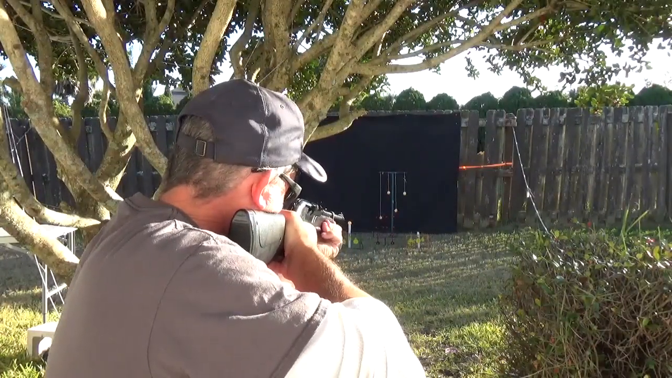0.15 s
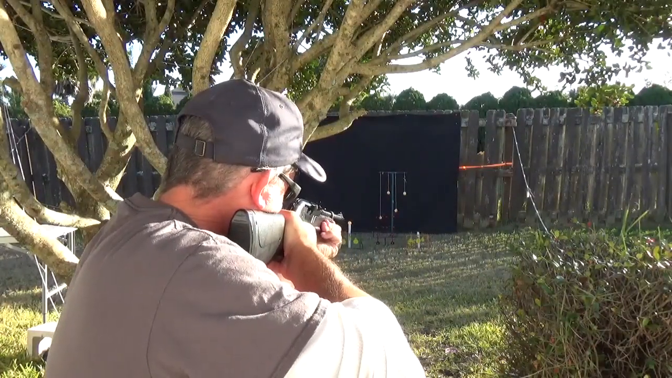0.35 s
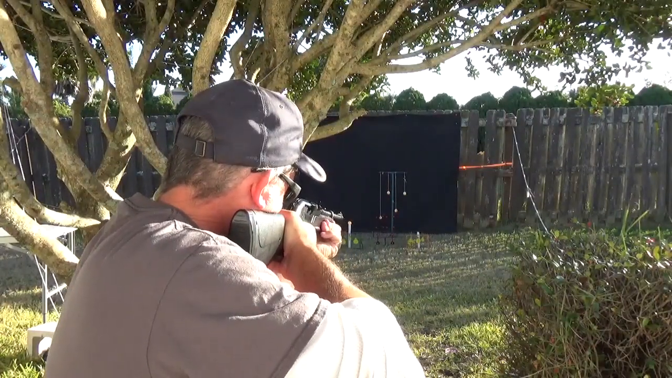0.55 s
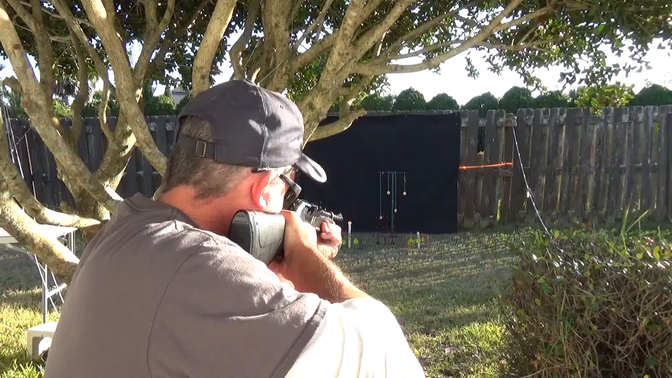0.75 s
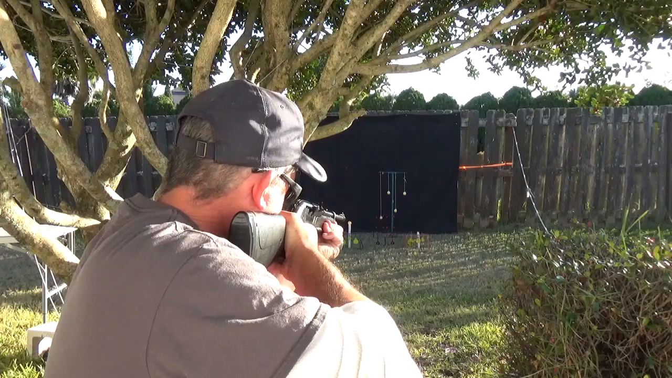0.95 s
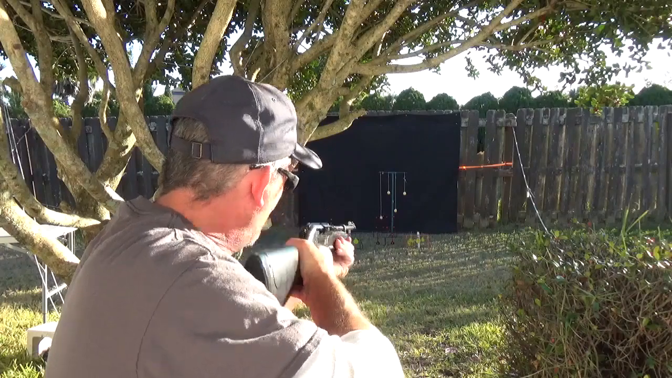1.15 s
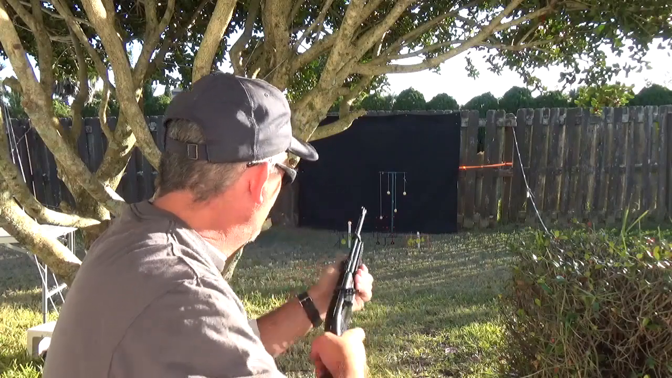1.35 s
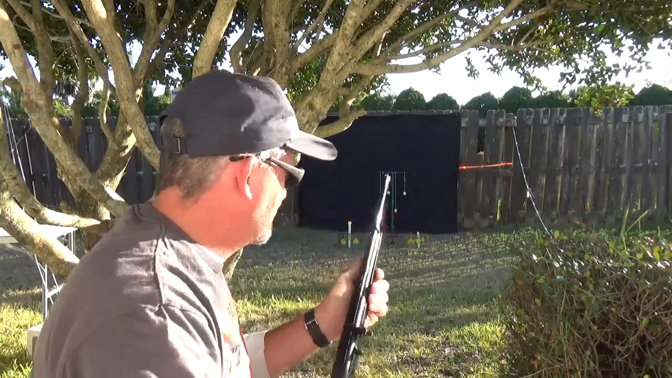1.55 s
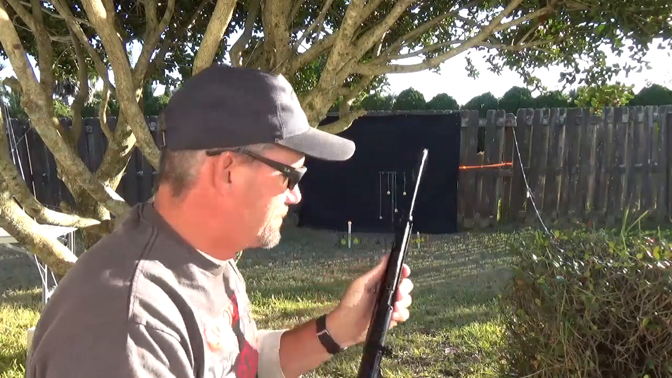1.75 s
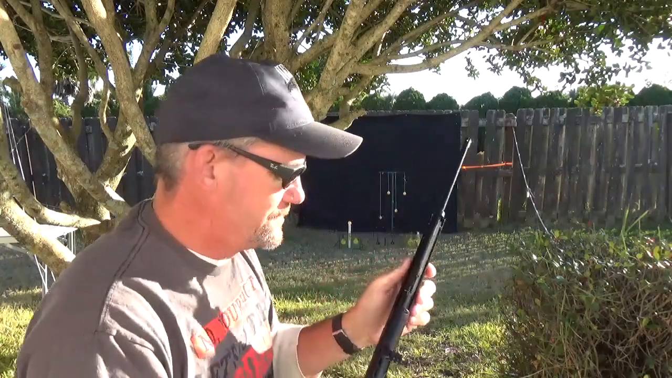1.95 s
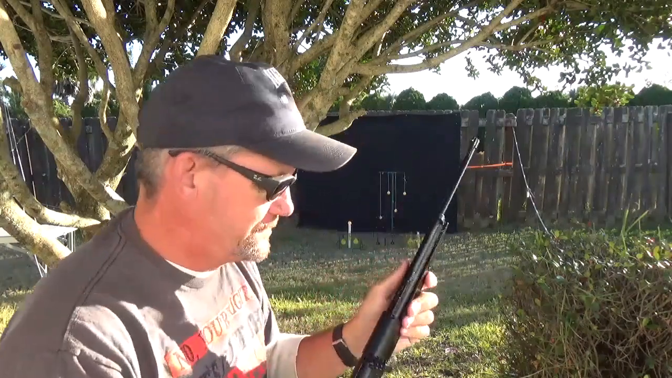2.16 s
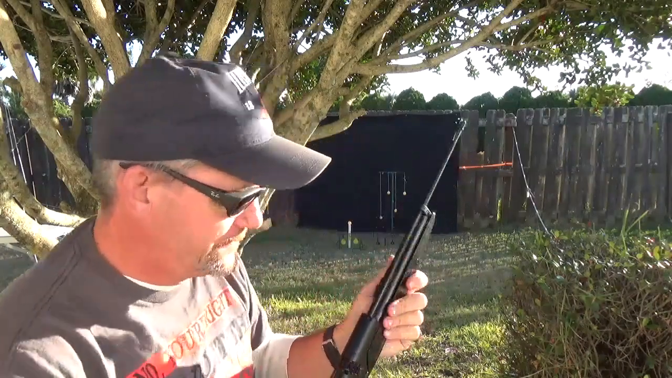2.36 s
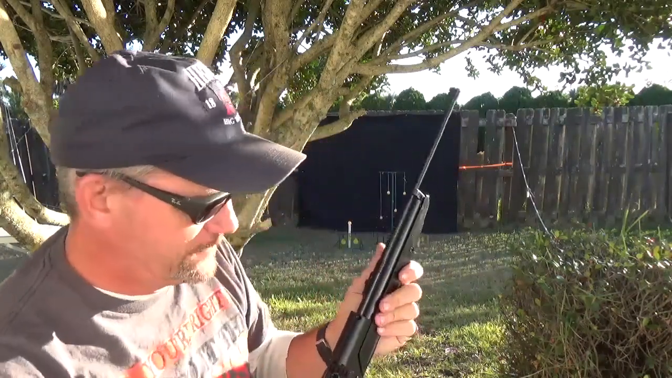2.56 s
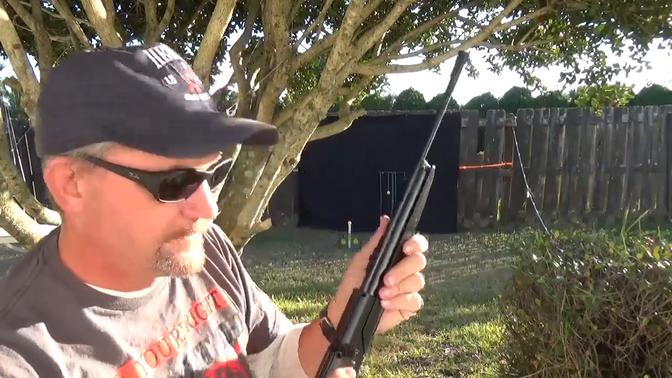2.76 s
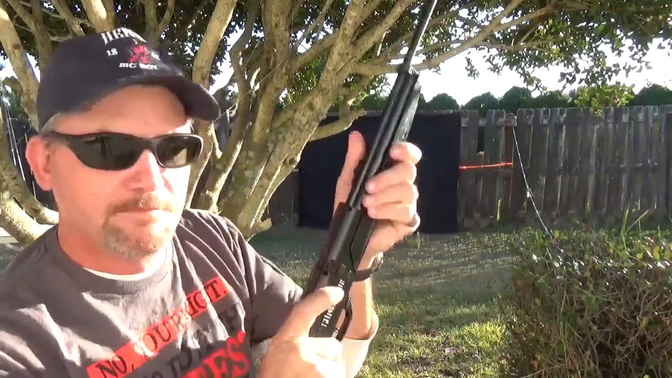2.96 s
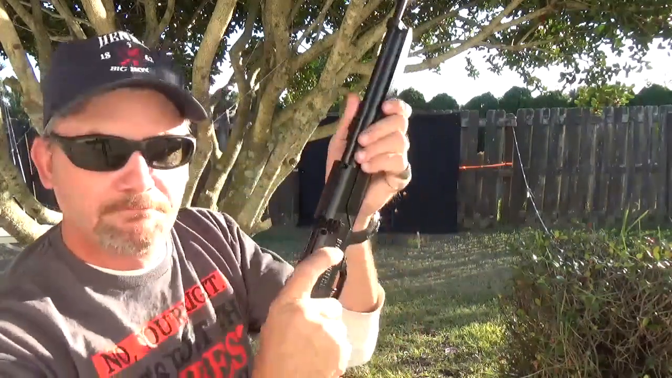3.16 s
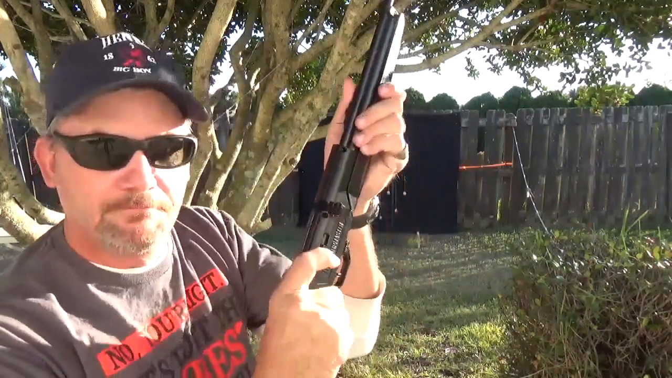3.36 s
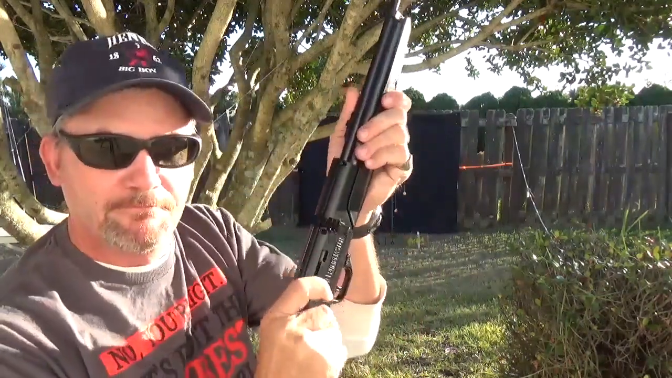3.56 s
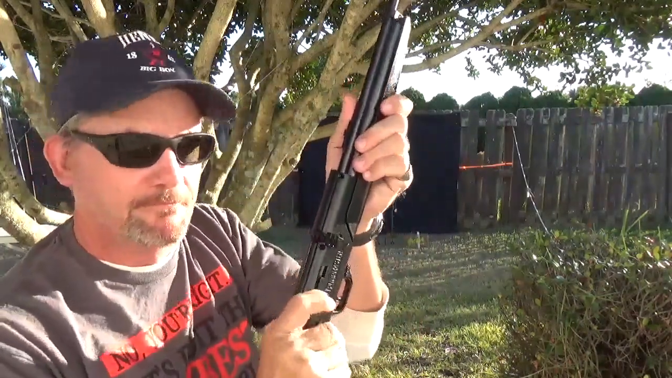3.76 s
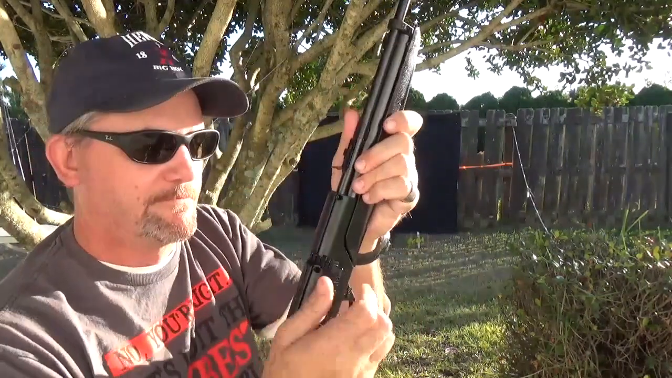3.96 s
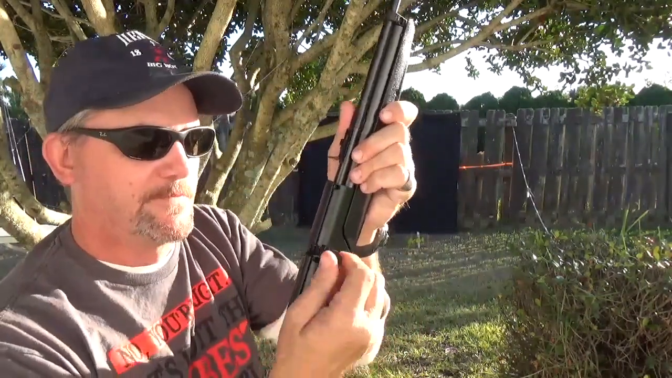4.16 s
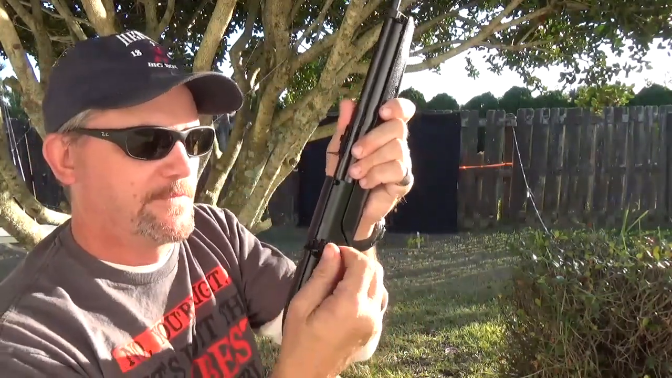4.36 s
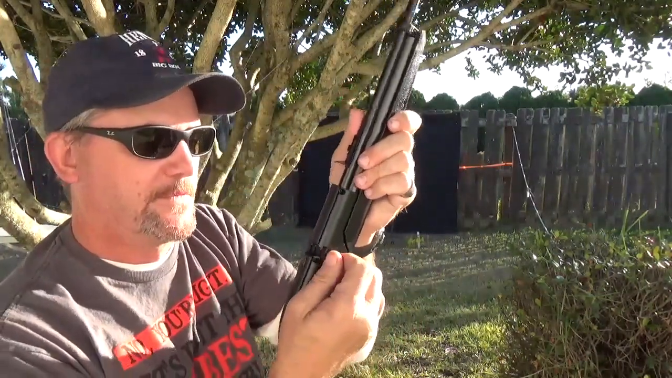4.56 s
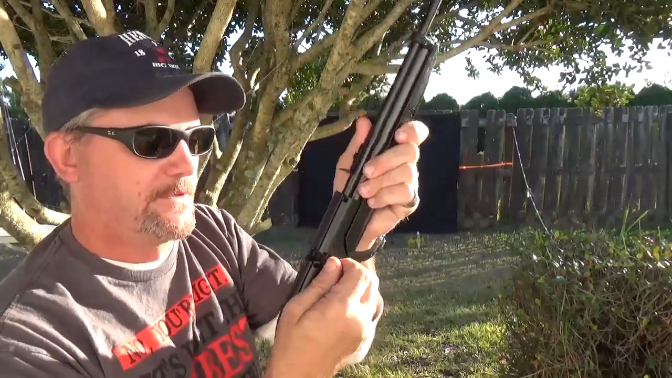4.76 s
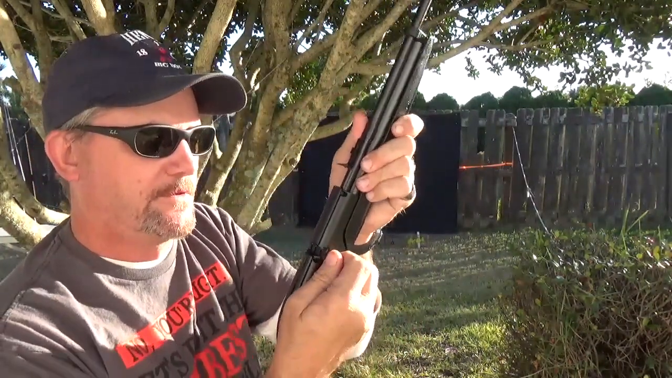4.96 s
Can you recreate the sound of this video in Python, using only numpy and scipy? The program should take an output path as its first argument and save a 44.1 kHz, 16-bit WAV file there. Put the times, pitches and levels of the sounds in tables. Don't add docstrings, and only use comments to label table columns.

```python
import sys
import numpy as np
from scipy import signal
from scipy.fft import rfft, irfft, next_fast_len
from scipy.io import wavfile
from scipy.ndimage import uniform_filter1d

SR = 44100
rng = np.random.default_rng(int(sys.argv[2]) if len(sys.argv) > 2 else 0)


def waveform_to_disk(signal):
    frames = np.transpose(np.atleast_2d(signal))
    scaled = np.clip(frames, -1, 1) * 32767
    samples = np.round(scaled).astype(np.int16)
    wavfile.write(sys.argv[1], SR, samples)


def magnitude_from_level(level_db):
    exponent = np.asarray(level_db, float) / 20
    return 10 ** exponent


N = 221002
TIME = np.arange(N) / SR


def evened(x):
    return x / np.sqrt(np.mean(x ** 2) + 1e-20)


def read(points, hz):
    f, value = np.transpose(points)
    return np.interp(np.log(hz + 1), np.log(f + 1), value)


def add(mix, s, sound):
    part = mix[round(s * SR):][:len(sound)]
    part += sound[:len(part)]


def coloured(x, spectrum):
    size = next_fast_len(len(x))
    gain = magnitude_from_level(read(spectrum, np.fft.rfftfreq(size, 1 / SR)))
    return evened(irfft(rfft(x, size) * gain, size)[:len(x)])


def grit(per_s, spread_db):
    size = magnitude_from_level(spread_db * np.minimum(rng.exponential(1, N), 3))
    contacts = size * (rng.random(N) < per_s / SR)
    return contacts * rng.standard_normal(N) + .5 * rng.standard_normal(N)


def resonate(x, hz, width):
    turn = np.exp(2j * np.pi * np.cumsum(hz * np.ones(len(x))) / SR)
    r = np.exp(-np.pi * width / SR)
    return 2 * (turn * signal.lfilter([1 - r], [1, -r], x / turn)).real


def resonate_twice(x, hz, width):
    return evened(resonate(resonate(x, hz, width), hz, width))


def slow_noise(shape, size):
    return evened(uniform_filter1d(rng.standard_normal(shape), size))


def struck(t, rise, t60):
    shape = (1 - np.exp(-(t / rise) ** 2)) * magnitude_from_level(-60 * t / t60)
    return shape / shape.max()


def tone(hz, t):
    return np.sin(2 * np.pi * hz * t)


def surges(peak_s, db, build_t60, fade_t60):
    t = TIME - np.asarray(peak_s)[:, None]
    build = 60 / (build_t60 * np.ones(len(t)))[:, None]
    slope = np.where(t < 0, build, -60 / fade_t60[:, None])
    level_db = db[:, None] + np.maximum(slope * t, -150)
    return np.sqrt((magnitude_from_level(level_db) ** 2).sum(0))


# (frequency [Hz], density [dB per Hz])
TRAFFIC = [(34, -40.5), (58, -7), (107, 1), (171, -13), (296, -19.5), (330, -24), (369, -16.5), (403, -18),
           (746, -19), (930, -23.5), (2150, -27.5), (3720, -33), (11200, -41.5), (14600, -83.5),
           (22000, -120)]
# (frequency [Hz], bandwidth [Hz], level [dB])
INSECTS = [(1858, 60, -78.5), (2000, 60, -77)]
# (peak time [s], level over their drone [dB], build-up T60 [s], fade T60 [s])
SONG = [(0.401, 3, 3, 2.8), (2.12, 8, 0.71, .5), (2.32, 12, 0.46, .5), (3.019, 5, 1.1, 1.3),
        (4.06, 4, 0.52, 0.53), (4.8, -0.5, 2.5, 3)]
# (frequency [Hz], level [dB])
MACHINE = [(35, -69.5), (291, -66.5)]


def garden():
    swell = evened(uniform_filter1d(slow_noise(N, 5000), 5000))
    out = magnitude_from_level(-54.5 + 0.44 * swell) * coloured(rng.standard_normal(N), TRAFFIC)
    for hz, width, db in INSECTS:
        song = .6 + surges(*np.transpose(SONG))
        out += magnitude_from_level(db) * song * resonate_twice(rng.standard_normal(N), hz, width)
    truck_s, truck_hz, truck_width_s = 4.2, 90, 0.073
    passing = magnitude_from_level(-53) * np.exp(-((TIME - truck_s) / truck_width_s) ** 2)
    rumble = resonate(rng.standard_normal(N), truck_hz, 93)
    out += passing * evened(resonate(rumble, truck_hz, 100))
    for hz, db in MACHINE:
        out += magnitude_from_level(db + 1.2 * swell) * tone(hz, TIME)
    return out


# (time [s], peak level [dB], top pitch [Hz], sweep [Hz], hoarseness [0-1])
CHIPS = [(.004, -45, 5800, 1500, .25), (.504, -61, 5580, 300, .15), (.516, -56, 5620, 300, .15),
         (.578, -46, 5750, 1600, .22), (1.38, -50, 5600, 900, .6), (1.62, -45, 5520, 900, .15),
         (2.185, -47, 5400, 800, .15), (3.179, -56, 5250, 300, .3), (3.19, -48, 5450, 500, .5),
         (4.608, -51, 5450, 900, .8), (4.72, -56, 5300, 900, .4)]


def bird():
    t, out = np.arange(SR // 40) / SR, np.zeros(N)
    for s, db, hz, sweep_hz, hoarse in CHIPS:
        pitch = hz - sweep_hz * (np.exp(-t / .002) + (t / .014) ** 4).clip(0, 1.2)
        pitch += 800 * hoarse * slow_noise(len(t), 50)
        wave = np.sin(2 * np.pi * np.cumsum(pitch) / SR)
        add(out, s, magnitude_from_level(db) * wave * struck(t, .0035, .045))
    return out


# (frequency [Hz], density [dB per Hz])
STEEL = [(1470, -53.5), (2500, -11), (3460, -5.5), (4680, -5.5), (6020, 3), (6530, 1), (7590, -1.5),
         (9300, -4.5), (10800, -5), (11200, -10), (14600, -46), (22000, -120)]


def contact(t, snap_t60, db, knock_db, knock_hz, clearness, knock_t60, rise):
    snap, push = rng.standard_normal((2, len(t)))
    width = knock_hz * max(.95 - 1.5 * clearness, .2)
    blurred = resonate_twice(push, knock_hz, width)
    knock = (1 - clearness) * blurred + clearness * 2.13 * tone(knock_hz, t)
    snap = coloured(snap, STEEL) * struck(t, rise, snap_t60)
    snap = 0.77 * snap / abs(snap).max()
    return magnitude_from_level(db) * (snap + .5 * magnitude_from_level(knock_db) * knock * struck(t, 1.3 * rise, knock_t60))


# (peak time [s], fizz [dB], swish re fizz [dB], build-up T60 [s], fade T60 [s])
RUSTLE = [(1.08, -62, -3.5, 0.6, 1), (1.228, -53.5, -3, 0.25, 1.8), (1.7, -59.5, 0.5, 2.2, 12),
          (1.794, -58.5, 2.5, 0.55, 2.5), (2.029, -44.5, 0.5, 0.088, 0.16), (2.16, -50, -7, 0.18, 0.28),
          (2.347, -51.5, -20, 0.26, 0.65), (2.423, -44.5, 6.5, 0.26, 0.11), (2.555, -64, 6, 0.51, 0.14),
          (2.8, -61, 0, .6, 0.26), (2.9, -53.5, -2, 0.11, 0.37), (3.139, -73.5, -9.5, .2, 0.54),
          (3.63, -67, 19, 0.88, 0.16), (3.849, -64.5, 6, 1.36, 0.62), (4.02, -68.5, 7, 0.26, 0.18),
          (4.141, -54, 7, 0.1, 0.27), (4.25, -65.5, 16.5, 0.57, 1.54), (4.6, -77, 7, 0.61, 0.73),
          (4.8, -70.5, 7, 0.78, 0.52)]
# (peak time [s], level [dB], build-up T60 [s], fade T60 [s])
SHIFTS = [(1.45, -55, 1.1, 6.3), (1.794, -46, 0.64, 2), (2.03, -43, 0.29, 0.15), (2.16, -47, 0.63, 0.53),
          (2.42, -47, 0.88, 1.5), (2.891, -56.5, 1.44, 4.2), (3.68, -50, 1.1, 3.7), (4.2, -56, 1.25, 3.04),
          (4.85, -55.5, 3.2, 3.1)]
# (frequency [Hz], density [dB per Hz])
FIZZ = [(3530, -18.5), (6000, -4), (8190, -9.5), (10600, -8), (11200, -12), (14600, -45), (22000, -120)]
SWISH = [(1060, -30.5), (1800, 1), (2100, -2), (2950, -2.5), (3750, -8), (5770, -1.5), (7000, -13.5),
         (9100, -44), (15400, -120)]
DULL = [(76, -36.5), (130, -10), (183, 6.5), (222, -7), (285, 4.5), (384, -1), (868, -1.5), (4500, -17.5),
        (5850, -57), (9900, -120)]
# (time [s], peak level [dB], knock re peak [dB], knock frequency [Hz])
TAPS = [(1.408, -42.5, -4.5, 2890), (1.554, -47.5, 5.5, 1894), (1.776, -30.5, -17, 845),
        (2.0199, -39, 3, 760), (2.106, -47, 3, 1800), (2.147, -38, -7, 870), (2.2944, -42, -1.5, 840),
        (2.348, -35, -26, 686), (2.374, -33, -11, 2050), (2.459, -39, -15, 754), (2.532, -43.5, 2.5, 1975),
        (2.6967, -35.5, 1.5, 1360), (3.0741, -56.5, -0.5, 1420), (2.651, -47, -16, 2170),
        (2.9634, -46.5, -4.5, 1700), (3.1421, -48, -5.5, 604), (4.009, -36.5, -6.5, 1710)]
# (time [s], peak level [dB], knock re peak [dB], knock frequency [Hz])
BUMPS = [
    (1.7672, -37, 5, 242),
    (1.7761, -36, 0, 460),
    (1.7889, -42, 2.5, 860),
    (1.804, -48, -1, 755),
]
# (time [s], peak level [dB], knock re peak [dB], knock frequency [Hz])
KNOCKS = [(2.0203, -30.5, -1, 814), (2.4042, -38, 1.5, 758), (2.4112, -30, 3.5, 880),
          (2.4185, -35.5, 7, 880), (2.4265, -29.5, 6, 893), (2.4405, -40, 4, 880), (2.416, -41.5, 8, 2950),
          (2.417, -40, 7, 1500), (2.425, -41, 7.5, 2960), (2.425, -38, 7, 2100), (2.43, -43, 6, 3400)]
# (time [s], peak level [dB], knock re peak [dB], knock frequency [Hz])
PINGS = [
    (2.537, -47, 8, 1293),
    (2.899, -39, -10.5, 1294),
]
# (time [s], peak level [dB], knock re peak [dB], knock frequency [Hz])
TICKS = [(1.5285, -43, -26.5, 3470), (1.5523, -43, 3, 2000), (1.658, -32, -23, 2320),
         (2.5288, -35.5, -1.5, 4920), (3.7285, -36, -3, 3080), (4.1255, -53.5, -5, 2156),
         (4.1395, -41.5, -1.5, 1105), (4.151, -36, -8, 2400), (4.165, -49, -10, 2220),
         (4.2295, -39, -1, 4500)]
# (clearness [0-1], knock T60 [s], snap T60 [s], rise [s])
CONTACTS = [
    (0.17, 0.047, 0.02, 0.0017),
    (0.27, 0.088, 0.024, 0.0019),
    (0.45, 0.068, 0.02, 0.0013),
    (0.68, 0.12, 0.026, 0.0019),
    (0.24, 0.015, .011, 0.0011),
]


def handling():
    s, fizz_db, swish_db, build, fade = np.transpose(RUSTLE)
    out = surges(s, fizz_db, build, fade) * coloured(grit(3000, 2.5), FIZZ)
    out += surges(s, fizz_db + swish_db - 3.5, build, fade) * coloured(grit(2100, 1.65), SWISH)
    out += magnitude_from_level(-6.0) * surges(*np.transpose(SHIFTS)) * coloured(grit(2000, 2.3), DULL)
    t = np.arange(SR // 6) / SR
    for rows, kind in zip((TAPS, BUMPS, KNOCKS, PINGS, TICKS), CONTACTS):
        clearness, knock_t60, snap_t60, rise = kind
        for s, db, knock_db, knock_hz in rows:
            add(out, s, contact(t, snap_t60, db, knock_db, knock_hz, clearness, knock_t60, rise))
    return out


# (time [s], peak level [dB], frequency [Hz], T60 [s])
CHINKS = [(3.0745, -43, 1420, .02), (3.2243, -22, 6100, .012), (3.2279, -12, 6090, .014),
          (3.2282, -13, 7980, .014), (3.2292, -19, 3610, .01), (3.2312, -20, 1560, .035),
          (3.2282, -16, 9170, .01), (3.2703, -6, 7440, .012), (3.2701, -13, 9100, .01),
          (3.2712, -16.5, 5860, .014), (3.2696, -22, 1730, .03), (3.2845, -24, 6100, .015),
          (3.3388, -25.5, 7360, .014), (3.3465, -23, 3110, .014), (3.3625, -24, 10700, .014),
          (3.3642, -26, 1630, .02), (3.439, -25, 5740, .025), (3.4395, -25, 6930, .025),
          (3.44, -26, 8010, .02), (3.4385, -28, 3440, .02), (3.4749, -9, 8610, .01),
          (3.4755, -10, 6860, .01), (3.4746, -18, 2915, .012), (3.4772, -16, 6080, .012),
          (3.4752, -21, 1620, .025), (3.7393, -25, 2040, .01), (3.7439, -13, 8000, .008),
          (3.7442, -13, 6120, .016), (3.7437, -15, 9900, .007), (3.7466, -22, 1570, 0.023),
          (3.7448, -21, 3270, .01), (3.745, -21, 7100, 0.0098), (3.756, -33, 2853, .035),
          (3.4747, -15, 10300, .01)]
# (time [s], peak level [dB], frequency [Hz], T60
# [s])
RINGING = [(3.272, -38, 5930, .25), (3.272, -36, 6080, .2), (3.272, -38, 7526, .25), (3.272, -42, 8581, .2),
           (3.272, -41, 9819, .13), (3.272, -41, 10530, .14), (3.479, -34, 1125, .08),
           (3.479, -32, 5949, .1), (3.479, -32, 6148, .14), (3.479, -37, 6670, .18), (3.479, -36, 7540, .2),
           (3.479, -38, 8619, .13), (3.479, -39, 4861, .09), (3.748, -38, 6100, .08),
           (3.23, -38, 5890, .15), (3.23, -39, 7800, .12)]


def chinks(rattle):
    out = np.zeros((2, N))
    for layer, rows, rise, grip in zip(out, (CHINKS, RINGING), (.001, .004), (.007, .4)):
        for s, db, hz, t60 in rows:
            t = np.arange(0, t60 + .01, 1 / SR)
            choked = struck(t, rise, t60) * np.exp(-(t / grip) ** 2)
            add(layer, s, magnitude_from_level(db) * choked * tone(hz, t))
    return out[0] + out[1] * rattle ** 3


# (time [s], peak level [dB], knock re peak [dB], knock frequency [Hz], ring re peak [dB])
CLICKS = [(3.223, -15, -17, 2970, -13), (3.2278, -4, -19, 1590, -39), (3.2283, -34, -8.5, 440, -40),
          (3.2321, -15.5, -11, 802, -42.5), (3.2698, -6, -17, 2200, -23), (3.2857, -22.5, -16, 1820, -63.5),
          (3.3384, -18.5, -12, 1610, -28.5), (3.3456, -19.5, -5.5, 2915, -24),
          (3.362, -18, -11.5, 1570, -50), (3.4064, -30, -14, 1480, -14.5),
          (3.4148, -30.5, -11.5, 3100, -26), (3.4384, -17.5, -13, 3170, -24.5),
          (3.442, -16, -13.5, 1293, -38), (3.4594, -19.5, -8.5, 2410, -27),
          (3.468, -22.5, -10, 2400, -41.5), (3.4743, -4, -17.5, 2760, -23),
          (3.477, -15.5, -10, 1146, -39.5), (3.4878, -18, -11.5, 1120, -52.5),
          (3.4997, -15, -25, 1055, -43), (3.5445, -24.5, -10, 1550, -46), (3.7395, -23, -11, 2060, -16.5),
          (3.7436, -4, -21, 1570, -43.5), (3.7446, -25.5, -10.5, 640, -40)]
# (frequency [Hz], level [dB])
RECEIVER = [(1120, -1), (1620, -2), (2930, -19), (4210, -27.5), (4860, -10), (5950, -4), (6200, 2.5),
            (6800, -4), (7550, 8), (8150, -6.5), (8600, 1), (9200, -13.5), (9820, -4), (10450, -8)]
# (frequency [Hz], density [dB per Hz])
HOLLOW = [(240, -55.5), (400, -23), (911, -1.5), (1080, -19.5), (1680, -27.5), (2130, -15), (2420, -3.5),
          (4900, -1.5), (6150, 2.5), (8710, -6), (11200, -4.5), (14600, -41), (22000, -120)]
# (peak time [s], hiss [dB], squeal [dB], squeal frequency [Hz], fade T60 [s])
SLIDE = [(3.228, -23.5, -33.5, 780, 0.07), (3.334, -52.5, -44, 1660, 0.22), (3.44, -24, -38.5, 1273, 0.025),
         (3.471, -29.5, -44.5, 1150, 0.22), (3.53, -61, -50.5, 1170, 0.37),
         (3.574, -44.5, -44.5, 1154, 0.11), (3.715, -74.5, -51.5, 2300, 0.56),
         (3.735, -56, -48, 2150, 0.081), (3.745, -25.5, -51, 2100, 0.021), (3.758, -55, -41, 2790, 0.04),
         (3.80, -64, -69, 2000, 0.27)]


def bolt():
    t, out, shake = np.arange(SR // 3) / SR, np.zeros(N), np.zeros(N)
    for s, db, knock_db, knock_hz, ring_db in CLICKS:
        add(out, s, contact(t, 0.014, db, knock_db, knock_hz, 0.3, knock_t60=0.059, rise=0.00099))
        add(shake, s, magnitude_from_level(db + ring_db) * struck(t, 0.00024, 0.25))
    modes = evened(sum(magnitude_from_level(0.5 * db) * resonate(rng.standard_normal(N), hz, 100) for hz, db in RECEIVER))
    buzz = 0.7 * modes + 0.87 * coloured(grit(5000, 0.77), HOLLOW)
    rattle = magnitude_from_level(1.3 * slow_noise(N, 130))

    s, hiss_db, squeal_db, squeal_hz, fade = np.transpose(SLIDE)
    stroke_t60, squeal_width_hz = 0.026, 420
    squeal_hz = np.interp(TIME, s, squeal_hz)
    scrape = grit(4400, 2.3)
    squeal = resonate_twice(scrape, squeal_hz, squeal_width_hz)
    out += surges(s, hiss_db, stroke_t60, fade) * coloured(scrape, STEEL)
    out += surges(s, squeal_db, stroke_t60, fade) * squeal
    return out + shake * buzz * rattle + chinks(rattle)


LOW_HZ = (5043, 5074, 5119, 5012)
HIGH_HZ = (10979, 10769, 8858, 8920, 7367)
# (level [dB], T60 [s])
LOW_RINGS = [(-12.5, 0.37), (-9.5, 0.16), (-21, 0.089), (-36.5, 0.4)]
HIGH_RINGS = [(-13.5, 0.41), (-15.5, 0.18), (-30.5, 0.26), (-39, 0.2), (-31, 0.096)]
# (time [s], level [dB])
SPIN_LOW = [(.808, -3), (.815, 0.5), (.83, 2.5), (.845, -3), (.863, -9), (.885, 1.5), (.906, -3),
            (.922, -14), (.965, -6.5), (1.04, 0), (1.075, -7.5), (1.15, -3)]
SPIN_HIGH = [(.808, -6.5), (0.824, 6), (.845, -5.5), (.87, 7.5), (.9, 6.5), (.95, 1.5), (1.0, -3.5),
             (1.035, -3), (1.07, -5), (1.1, -14)]


def plate():
    t, hit_s = np.arange(SR // 2) / SR, .8066
    out = np.zeros((2, N))
    for layer, pitches, rings in zip(out, (LOW_HZ, HIGH_HZ), (LOW_RINGS, HIGH_RINGS)):
        for hz, (db, t60) in zip(pitches, rings):
            add(layer, hit_s, magnitude_from_level(db) * struck(t, .0009, t60) * tone(hz, t))
    wobble = evened(uniform_filter1d(slow_noise((2, N), 150), 150))
    wobble_db = [[1.2], [.3]] * wobble * np.clip((TIME - hit_s) / .04, 0, 3.5)
    facing_db = [np.interp(TIME, *np.transpose(spin)) for spin in (SPIN_LOW, SPIN_HIGH)]
    return (out * magnitude_from_level(facing_db + wobble_db)).sum(0)


# (time [s], peak level [dB], frequency [Hz])
CRACKS = [(.7296, -9, 2700), (.73, -7, 6700), (.7314, -8, 2800), (.7334, -9, 7000), (.7374, -6, 5500),
          (.7381, -7, 8000), (.7395, -3, 9300), (.7409, -10, 9000), (.7421, -11, 8800), (.7434, -9, 5600),
          (.7434, -9, 9600), (.7503, -11, 9000), (.7583, -6.5, 7400), (.7703, -12, 7600),
          (.7748, -8.5, 7400), (.7837, -6, 9000), (.7855, -6, 6800), (.7905, -9, 6000)]
# (peak time [s], hiss [dB], body [dB], build-up T60 [s], fade T60 [s])
RUSH = [
    (0.719, -66, -50.5, 0.0077, .3),
    (0.729, -19, -24.5, 0.0033, 0.099),
    (.75, -24, -47.5, .03, 0.24),
    (0.781, -20.5, -28, 0.12, 0.25),
    (.8, -28, -37.5, .08, 0.04),
    (0.837, -33, -32, 0.19, 0.17),
    (.875, -45.5, -49.5, .1, 0.32),
    (.9, -57, -44.5, 0.27, 0.58),
]
# (frequency [Hz], density [dB per Hz])
HISS = [(1470, -39), (2500, -19.5), (3270, -18), (3600, -13), (4900, -6.5), (5600, -1.5), (7540, -2),
        (10100, -2), (11200, -5.5), (14600, -32), (22000, -120)]
BODY = [(71, -35.5), (120, -37.5), (183, -5.5), (500, -14), (686, -12), (752, 1), (1020, -5.5),
        (1100, -2.5), (1220, -4), (1600, -6), (3080, -3), (4500, -8), (5850, -25.5), (9900, -120)]
# (time [s], peak level [dB], frequency [Hz], T60 [s])
THUMPS = [(0.7288, -17, 1154, 0.015), (0.7371, -31, 426, 0.053), (.738, -19.5, 840, 0.0061),
          (.739, -37.5, 203, 0.062), (0.781, -39.5, 700, .05), (0.846, -29.5, 1246, 0.035),
          (0.7301, -11.5, 2750, .02), (.779, -22, 2340, .012), (.783, -25, 950, .03),
          (.793, -22, 3620, .012)]


def shot():
    s, hiss_db, body_db, build, fade = np.transpose(RUSH)
    trigger, fired = TIME > s[0] - .002, TIME >= s[1] - .0005
    out = fired * surges(s, hiss_db + 3.5, build, fade) * coloured(grit(7200, -2), HISS)
    out += trigger * surges(s, body_db, build, fade) * coloured(grit(4000, 2.0), BODY)
    t = np.arange(200) / SR
    for s, db, hz in CRACKS:
        wave = tone(hz, t) + .45 * rng.standard_normal(len(t))
        add(out, s, magnitude_from_level(db) * struck(t, .0002, .0018) * wave)
    t = np.arange(3000) / SR
    for s, db, hz, t60 in THUMPS:
        add(out, s, magnitude_from_level(db) * struck(t, 0.00065, t60) * tone(hz, t))
    return signal.sosfilt(signal.butter(2, 130, "high", fs=SR, output="sos"), out)


def yard(x, t60):
    size = SR // 2
    signs = rng.choice([-1., 1.], (2, size))
    taps = signs * (rng.random((2, size)) < .05) * struck(np.arange(size) / SR, 0.0012, t60)
    return signal.fftconvolve(x[None], taps / np.linalg.norm(taps[0]), axes=1)[:, :N]


def ducking(loud):
    threshold_db, share, recover_db_per_s = -24.5, 0.38, 42
    power_db = 10 * np.log10(abs(uniform_filter1d(loud ** 2, size=800)) + 1e-12)
    fall = TIME * recover_db_per_s
    held_db = np.maximum.accumulate(power_db + fall) - fall
    over_db = np.maximum(held_db - threshold_db, 0)
    return magnitude_from_level(-share * uniform_filter1d(over_db, size=400))


def scene():
    near, far, ring, blast = bolt() + handling(), bird(), plate(), shot()
    loud = near + blast + ring
    dry = loud + garden() * ducking(loud) + .6 * far
    echoes = magnitude_from_level(-24) * yard(near, 0.095) + magnitude_from_level(-23.0) * yard(ring, 0.27)
    echoes += magnitude_from_level(-3.0) * yard(far, 0.51) + yard(far, 0.091)
    return dry + echoes


# (frequency [Hz], likeness [0-1])
SAME = [(60, 1), (220, 0.94), (840, 0.95), (3130, 0.96), (11700, 0.89)]
# (frequency [Hz], level [dB])
LEFT = [(60, 2.5), (170, 3), (490, 0.5), (1420, 0), (4080, 0.5), (11700, 0.5)]


def capsules(dry):
    hz, _, z = signal.stft(dry, SR, nperseg=256)
    same = np.clip(read(SAME, hz), 0, 1)[:, None]
    apart = np.sqrt((1 - same) / 2) * np.exp(2j * np.pi * rng.random(z[0].shape))
    tilt = magnitude_from_level(read(LEFT, hz)[:, None] / 2)
    z = np.array([z[0] * (1 + apart) * tilt, z[1] * (1 - apart) / tilt])
    return signal.istft(z, SR, nperseg=256)[1][:, :N]


def band_limit(x):
    return signal.sosfilt(signal.butter(12, 12320, fs=SR, output="sos"), x)


def record(dry):
    both = np.clip(capsules(dry), -.9, .9)
    lowpass = signal.firwin(1601, 11075, window=("kaiser", 6), fs=SR)
    both = signal.oaconvolve(both, lowpass[None], "same")
    return band_limit(both)


dry = scene()
out = record(dry)
waveform_to_disk(out)
```